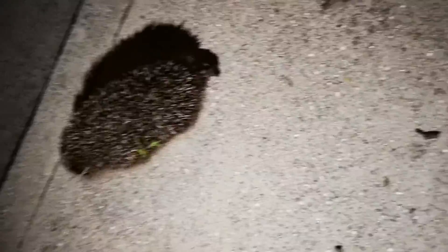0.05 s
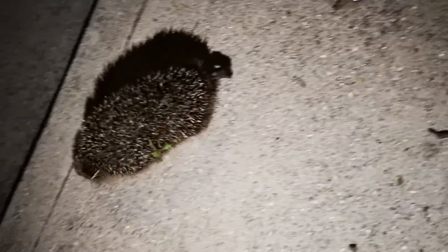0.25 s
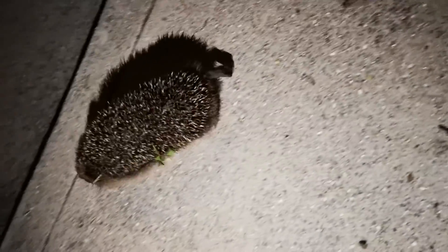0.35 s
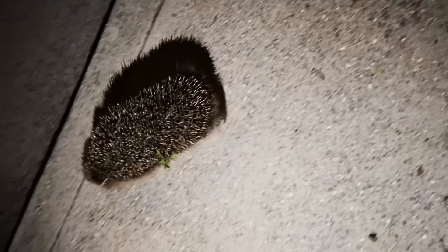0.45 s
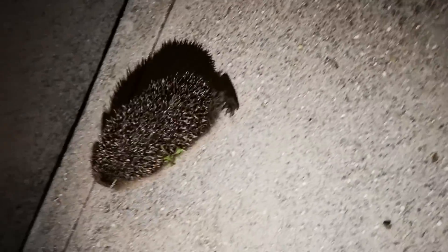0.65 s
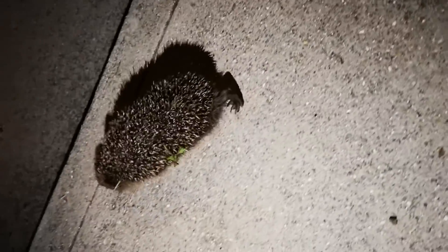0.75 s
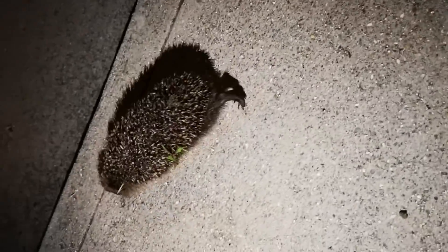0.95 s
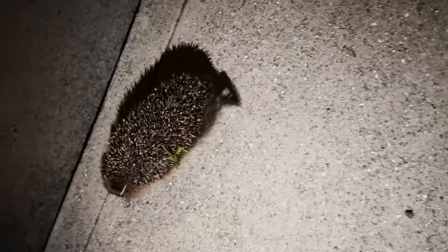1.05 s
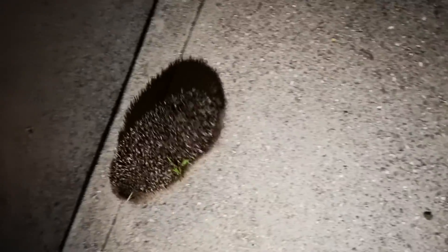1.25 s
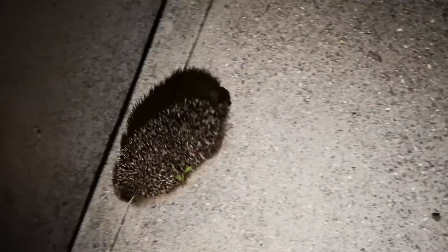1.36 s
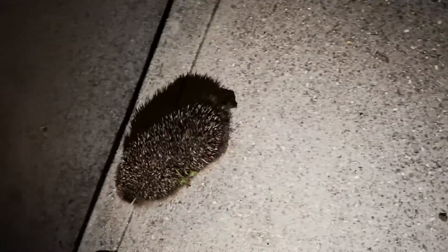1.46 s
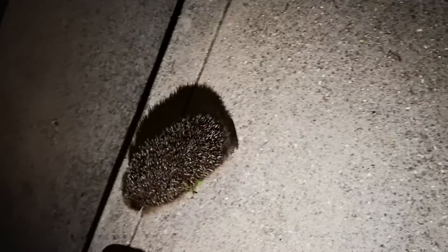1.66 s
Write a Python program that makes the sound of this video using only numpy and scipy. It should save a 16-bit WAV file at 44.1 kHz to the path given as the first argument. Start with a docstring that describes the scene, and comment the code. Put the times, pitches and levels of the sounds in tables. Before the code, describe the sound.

A finger bumps and briefly brushes a hand-held microphone on a quiet night.

```python
"""A bump, probably from a finger, on a hand-held recorder near its right microphone, on a quiet night.
The hit makes a tick and a low thump, the case rings, and a faint boom sinks in pitch.
The finger then brushes along the case with a short huff. A few faint scratches follow, from the grip
or the claws of a hedgehog on the pavement. Behind it all are a thin hiss, the hum of far traffic
and the deep rumble of the hand holding the case."""
import sys
import numpy as np
from scipy import signal
from scipy.io import wavfile

SR = 44100
rng = np.random.default_rng(int(sys.argv[2]) if len(sys.argv) > 2 else 0)


def pcm_store(signal):
    """Save signal as 16-bit PCM."""
    levels = np.round(np.clip(np.atleast_2d(signal), -1, 1) * 32767)
    wavfile.write(sys.argv[1], SR, levels.astype(np.int16).T)


N = 74970
T = np.arange(N) / SR


def from_db(db):
    """Turn decibels into a number to multiply by."""
    return 10 ** (np.asarray(db) / 20)


def at_hz(points, hz):
    """Read between the rows of a (frequency, value) table, with octaves evenly spaced."""
    freqs, values = np.transpose(points)
    return np.interp(np.log(hz), np.log(freqs), values)


def noise_bands(spectrum):
    """Noise in third-octave bands, as (centres, bands); together they have an average (rms) level of 1."""
    edges = 18 * 2 ** (np.arange(31) / 3)
    centres = np.sqrt(edges[1:] * edges[:-1])
    white = rng.standard_normal((3, N + SR // 2))
    used = np.flatnonzero((centres > spectrum[0][0] / 1.2) & (centres < spectrum[-1][0] * 1.2))
    bands = []
    for k in used:
        band_pass = signal.butter(2, edges[k:k + 2], "band", fs=SR, output="sos")
        band = signal.sosfilt(band_pass, white[k % len(white)])[-N:]
        bands.append(from_db(at_hz(spectrum, centres[k])) * band)
    return centres[used], np.array(bands) / np.sum(bands, axis=0).std()


def noise(spectrum):
    """Noise with the given balance of low and high tones, at an average (rms) level of 1."""
    return noise_bands(spectrum)[1].sum(0)


def envelope(start_s, rise_s, hold_s, fall_s):
    """A volume curve that rises, holds and falls in straight lines."""
    return np.interp(T, start_s + np.cumsum([0, rise_s, hold_s, fall_s]), [0, 1, 1, 0])


def pulse(peak_s, width_s):
    """A smooth hill of height 1."""
    return np.exp(-.5 * ((T - peak_s) / width_s) ** 2)


def ring(blow, hz, fade_s):
    """A blow starts a pure tone that drops by 60 dB in fade_s."""
    decay, step = from_db(-60 / (fade_s * SR)), 2 * np.pi * hz / SR
    return signal.lfilter([0, np.sin(step)], [1, -2 * decay * np.cos(step), decay ** 2], blow + 1e-18)


def from_right(left, right, lag_s=.00059):
    """A sound by the right microphone reaches the left one later."""
    return np.array([np.interp(T - lag_s, T, left), right])


def hiss(level_db=-70):
    """Distant night noise and microphone hiss: steady, and separate in each ear."""
    # tone of the hiss: f/Hz, relative level/dB
    spectrum = [(250, 2), (450, -2), (620, -6), (900, 3.5), (1250, 0), (2000, -2), (2600, -7), (3400, -12),
                (4300, -14.5), (5400, -14), (9000, -21), (13000, -22.5), (15500, -22.5)]
    # how much louder the left side is: f/Hz, left minus right/dB
    balance = [(300, -3.5), (700, 2), (1300, -4.5), (2400, 0.5), (4400, 0), (15000, -1)]
    ears = []
    for side in (1, -1):
        centres, bands = noise_bands(spectrum)
        ears.append(from_db(level_db + side * at_hz(balance, centres) / 2) @ bands)
    return np.array(ears)


def traffic(level_db=-62.5, spread_db=-19.5):
    """Far traffic blurs into a low hum, nearly the same in both ears."""
    # tone of the hum: f/Hz, relative level/dB
    spectrum = [(70, 0), (105, 2.5), (150, 3.5), (220, -0.5), (290, -16), (400, -37), (600, -43)]
    middle = noise(spectrum)
    spread = from_db(spread_db) * noise(spectrum) * [[1], [-1]]
    return from_db(level_db) * (middle + spread)


def hand_rumble():
    """The hand holding the case makes a deep rumble that swells and fades."""
    # loudness of the rumble: t/s, level/dB
    loudness = [(0, -62), (.15, -54), (.29, -51), (.45, -64), (.62, -53.5), (.71, -59.5), (.77, -52),
                (.82, -52.5), (.87, -58), (1.09, -58.5), (1.135, -50), (1.2, -60), (1.35, -53),
                (1.47, -61.5), (1.6, -59.5), (1.7, -57.5)]
    # tone of the rumble: f/Hz, relative level/dB
    spectrum = [(20, -21.5), (36, -4), (48, -4), (63, -3.5), (80, -7.5), (110, -23), (200, -37.5)]
    return from_db(np.interp(T, *np.transpose(loudness))) * noise(spectrum)


def scratches(grain_db=3, grain_s=.00061):
    """Claws or the grip make tiny bright scrapes, each a short swell of grainy noise."""
    # the scrapes: t/s, width/s, level/dB, left minus right/dB
    scrapes = [(0.334, 0.013, -67.5, -20), (0.355, 0.0012, -63, -18), (0.37, 0.03, -80, -8),
               (0.93, .004, -71.5, -2.5), (0.945, 0.0057, -75, -4), (1.182, 0.011, -78.5, -5),
               (1.213, 0.0026, -75.5, -7), (1.479, .002, -77, -8), (1.506, 0.0015, -65.5, -9)]
    # tone of a scrape: f/Hz, relative level/dB
    spectrum = [(1500, -26), (4000, 1), (7000, 1), (9000, -7), (11000, 10), (13000, 2), (15000, 2)]
    swells = sum(from_db([[db + left_db], [db]]) * pulse(t, width) for t, width, db, left_db in scrapes)
    grain = from_db(grain_db * np.interp(T / grain_s, np.arange(N), rng.standard_normal(N)))
    return swells * grain * [noise(spectrum), noise(spectrum)]


def boom(level_db=-52.5, bandwidth_hz=5.8):
    """A faint boom that wavers and sinks in pitch after the thump."""
    # the sinking pitch: t/s, f/Hz
    pitch = [(.25, 77.86), (.36, 72.75), (.44, 39.97), (.66, 34.3)]
    # two slowly drifting random signals give an angle that makes the tone waver
    smooth = np.exp(-np.pi * bandwidth_hz / SR)
    drift = signal.lfilter([1], [1, -2 * smooth, smooth ** 2], rng.standard_normal((2, N + SR)))[:, -N:]
    waver = np.unwrap(np.arctan2(*drift))
    phase = 2 * np.pi * np.cumsum(np.interp(T, *np.transpose(pitch))) / SR + waver
    swell = envelope(start_s=.21, rise_s=.043, hold_s=.397, fall_s=.065)
    return from_db(level_db) * np.sqrt(2) * np.sin(phase) * swell


def brush(level_db=-46.5, hold_s=.063, early_s_per_octave=.011):
    """The finger rubs along the case; it slows down, so the high tones fade first."""
    # tone of the rub, shaped by the right microphone's opening: f/Hz, relative level/dB
    spectrum = [(150, 7.5), (280, 2.5), (480, -7.5), (700, 1), (1100, -1), (1700, -0.5), (2700, -2),
                (3600, -10.5), (6300, -13.5), (7600, -20.5), (8700, -14), (11000, -16), (12500, -22),
                (15000, -16)]
    # how much weaker it is on the left: f/Hz, left minus right/dB
    left_drop = [(200, -3), (380, -5), (700, -9), (1300, -12), (2400, -18), (4400, -30), (15000, -22)]
    centres, bands = noise_bands(spectrum)
    holds = hold_s - early_s_per_octave * np.clip(np.log2(centres / 2000), 0, 2)
    swells = [envelope(start_s=.2047, rise_s=.026, hold_s=hold, fall_s=.059) for hold in holds]
    bands = from_db(level_db) * bands * swells
    return from_right(from_db(at_hz(left_drop, centres)) @ bands, bands.sum(0))


def bump(hit_s=.2006):
    """The finger hits the case: a low thump in both ears, and bright sounds mostly in the right."""
    # tones the case rings with: f/Hz, level/dB, time to fade by 60 dB/s
    case_tones = [(1050, -34.5, 0.011), (1600, -28.5, 0.0068), (2130, -49, 0.0059), (5500, -50, 0.013),
                  (7100, -41, .012)]
    contact = pulse(hit_s, width_s=.00004)
    blow = contact / contact.sum()
    thump = -from_db(-21) * ring(blow, hz=55.5, fade_s=.15)
    # the soft fingertip presses just after; this is rounder and weaker on the left
    push_s = hit_s + .00033
    push_right = from_db(-19.5) * pulse(push_s, width_s=.00065)
    push_left = from_db(-22) * pulse(push_s, width_s=.00094)
    # the first hard touch ticks, and the case gives way with a snap
    tick_cut_hz, snap_hz = 3400, 2270
    high_pass = signal.butter(2, tick_cut_hz, "high", fs=SR, output="sos")
    tick = from_db(-22.5) * signal.sosfilt(high_pass, contact)
    snap = from_db(-20) * pulse(hit_s, width_s=.00029) * np.cos(2 * np.pi * snap_hz * (T - hit_s))
    case = sum(from_db(db) * ring(blow, hz, fade_s) for hz, db, fade_s in case_tones)
    # tone of the skin scuffing as it lands: f/Hz, relative level/dB
    scuff_spectrum = [(1200, 10.5), (2500, 5.5), (4000, 2), (7000, -1), (11000, -3.5), (13500, 1.5)]
    landing = envelope(start_s=hit_s - .0052, rise_s=.0052, hold_s=.0046, fall_s=.0077)
    scuff = from_db(-43.5) * noise(scuff_spectrum) * landing
    bright = tick + snap + case + scuff
    return from_right(thump + push_left + from_db(-20) * bright, thump + push_right + bright)


def scene():
    """The bump, its boom, the brush and the scratches over the quiet background."""
    return bump() + boom() + brush() + scratches() + hiss() + traffic() + hand_rumble()


def record(dry, cutoff_hz=15250):
    """Cut away the very highest tones steeply."""
    return signal.sosfilt(signal.ellip(10, .1, 70, cutoff_hz, fs=SR, output="sos"), dry)


dry = scene()
out = record(dry)
pcm_store(out)
```